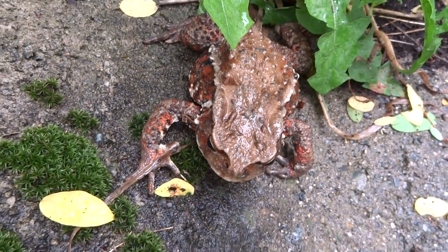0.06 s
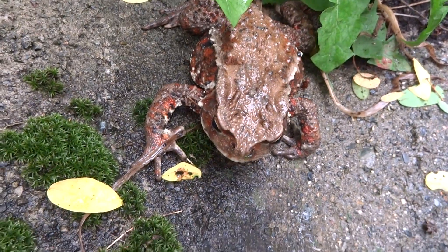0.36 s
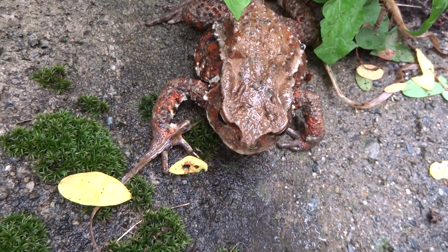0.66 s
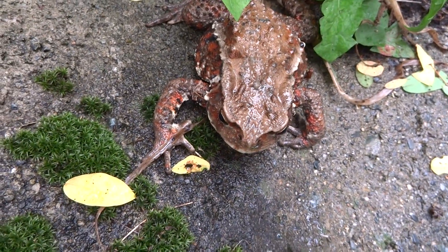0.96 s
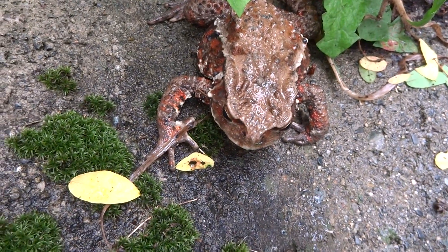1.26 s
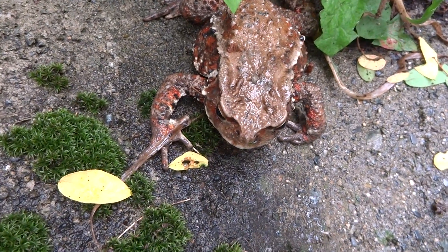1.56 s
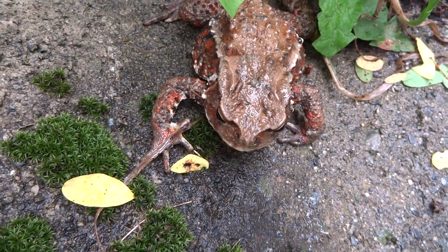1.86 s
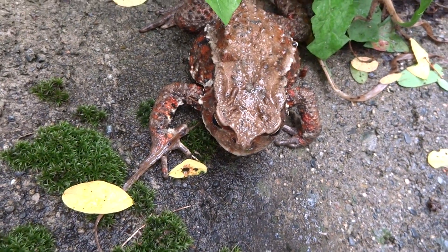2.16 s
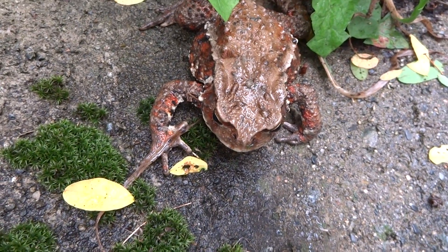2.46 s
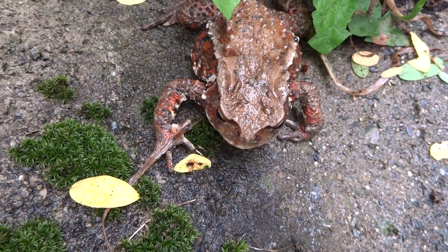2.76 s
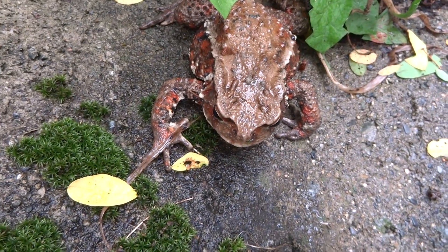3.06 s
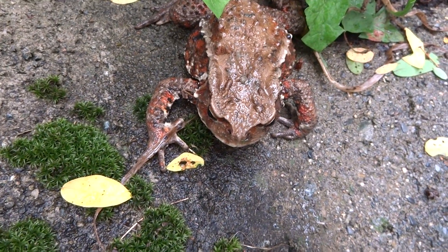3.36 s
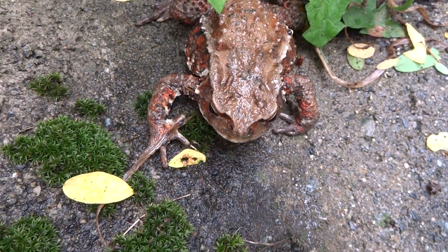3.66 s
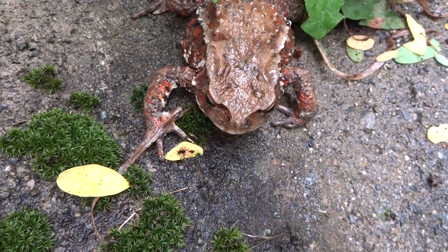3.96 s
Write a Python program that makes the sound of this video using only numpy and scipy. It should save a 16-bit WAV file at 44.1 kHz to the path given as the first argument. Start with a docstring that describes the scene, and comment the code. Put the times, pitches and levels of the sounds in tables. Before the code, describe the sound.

A toad croaks once, close by, from about 1.7 to 2 seconds, in an uneven, creaky run of dry pulses. Fine rain hisses steadily all around for the whole four seconds, with nearer drops ticking here and there. A soft, low plop comes at about 3.1 seconds. At 3.7 seconds there is a sharp, close knock on something small and hard, two contacts almost merged into one.

```python
"""Fine rain hisses all round a stereo pair of microphones, with nearer drops ticking throughout.
From 1.7 s comes a close, croak-like creak: an uneven train of dry pulses. One soft, low plop follows
at 3.1 s. Near the end, close to the microphones, two contacts on a small hard body make a sharp
double knock, ringing nearly the same resonances as the creak."""
import sys
import numpy as np
from scipy import signal
from scipy.fft import rfft, irfft, next_fast_len
from scipy.io import wavfile
from scipy.ndimage import uniform_filter1d

SR = 44100
rng = np.random.default_rng(int(sys.argv[2]) if len(sys.argv) > 2 else 0)


def transcribe(signal):
    """Save signal, clipped to [-1, 1], as a 16-bit WAV file at the path in sys.argv[1]."""
    frames = np.atleast_2d(signal).T
    limited = np.clip(frames, -1, 1)
    pcm = np.round(limited * 32767).astype(np.int16)
    wavfile.write(sys.argv[1], SR, pcm)


N = 176400
HZ = np.fft.rfftfreq(4096, 1 / SR)  # frequency grid of every click
TOP_HZ = 15900

# colour of the rain: f/Hz, relative level/dB
RAIN_COLOUR = [(15, -72), (25, -40), (61, -27), (107, -23.5), (174, -13.5), (235, -16), (284, -12.5),
               (371, -15.5), (513, -9), (572, -7), (691, -9.5), (749, -7), (1090, -5), (1180, -3.5),
               (1780, -4.5), (2460, -3.5), (3780, -3.5), (5670, 0.5), (6490, -1.5), (8050, -23.5),
               (9460, -31.5), (11100, -38), (12400, -33.5), (14200, -17), (15800, -21.5)]
# likeness of the hiss at the two microphones: f/Hz, correlation
RAIN_LIKENESS = [(60, 0.94), (200, 0.92), (450, 0.59), (700, 0.47), (1300, 0.96), (2400, 0.97),
                 (5000, 0.84), (8000, 0.32), (15000, 1)]
# balance of the rain: f/Hz, left over right/dB
RAIN_BALANCE = [(700, 0), (2400, .5), (6000, 1), (8000, 4), (13500, -6), (15500, 3.5)]
# phase of the rain across the pair: f/Hz, left lead/rad
RAIN_PHASE = [(300, 0.13), (1300, 0.53), (3800, 0.011), (7700, 0.13), (14000, 0.99)]
HISS_DB, HISS_PATCHY_DB, HISS_SWELL_DB = -43.5, 1, -0.46
# nearer raindrops: t/s, level/dB, brightness/(dB per octave)
NEAR_DROPS = [(.7030, -7, 0), (.7040, -10, -1.5), (1.0368, -15, -2), (1.1988, -16, -1), (1.4625, -20, 1),
              (1.5246, -14, -.5), (1.6286, -20, 2.5), (1.8483, -5, 0), (2.4866, -14, -3), (2.9465, -16, -1),
              (3.0519, -18, 0), (3.3035, -13, -.5), (3.929, -17, -3)]
FAR_DROP_COUNT, FAR_DROP_DB, FAR_DROP_SPREAD_DB = 210, -26.5, 7
DROP_RIPPLE_DB = 2.2  # colour change from drop to drop
PLOP_S, PLOP_HZ, PLOP_DB, PLOP_RISE_S, PLOP_T60_S, PLOP_LEAD_RAD = 3.1440, 540, -20, .003, .025, 2.07
SCATTER_DB, SCATTER_T60_S = -18, .03

# phase of the close sources across the pair: f/Hz, left lead/rad
CLOSE_PHASE = [(100, 0.91), (700, 2), (1700, 1.28), (2200, 1.4), (3800, 0.93), (8000, 0.25), (14000, 0.35)]
# bands of the close sources that take a cycle or two to swell: f/Hz, width/Hz
SWELL_BANDS = [(2300, 6800), (5200, 3400)]

# contacts: t/s, level/dB, brightness/(dB per octave), crack f/Hz, crack width/Hz, crack boost/dB
KNOCK_CONTACTS = [(3.6786, 2, -3.5, 2300, 700, 3), (3.6865, 0, 0, 4900, 330, 22.5)]
# colour of a contact: f/Hz, level/dB
KNOCK_SPECTRUM = [(100, -42), (450, -22), (900, -8), (1350, -5), (2000, 2), (2650, 8), (3300, -3),
                  (4200, -7), (5700, -10), (7000, -11), (8600, -19), (11000, -40), (15000, -20)]
# resonances of the knocked body: f/Hz, width/Hz, boost/dB
KNOCK_MODES = [(1050, 110, 11), (1755, 115, 12.5), (3960, 110, 5), (6100, 250, 7)]
# balance of the knock: f/Hz, left over right/dB
KNOCK_BALANCE = [(1000, 0.5), (2300, -5), (5000, -0.5)]

# pulses of the creak: t/s, level/dB, brightness/(dB per octave), upper resonance f/Hz
CREAK_PULSES = [(1.6631, -17.5, -2.5, 1650), (1.6937, -14, 4, 2190), (1.7073, -6, 0.5, 2400),
                (1.7182, -4.5, -1.5, 2350), (1.7335, -3, -0.5, 2520), (1.7590, -0.5, -2.5, 2550),
                (1.7921, -1.5, 1, 2510), (1.8256, -0.5, -2, 2700), (1.8815, 1, -1.5, 2550),
                (1.9198, 0.5, 0, 2050), (1.9393, -7, 1.5, 1980), (1.9579, -0.5, -.5, 2020),
                (1.978, -2.5, 2, 2030), (1.9980, -0.5, 0.5, 2220), (2.0241, 0.5, 1, 2960)]
# colour of a pulse: f/Hz, level/dB
CREAK_SPECTRUM = [(100, -52), (450, -25.5), (850, -14.5), (1250, -14.5), (1700, -5), (2200, -9.5),
                  (2750, -6.5), (3450, -5), (3800, -10.5), (4500, -17), (5250, -5.5), (6100, -14),
                  (6800, -27), (8200, -32), (10000, -52), (15000, -55)]
# resonances of the creak: f/Hz, width/Hz, boost/dB
CREAK_MODES = [(1055, 125, 13), (1635, 230, 14.5), (3970, 110, 6)]
# balance of the creak: f/Hz, left over right/dB
CREAK_BALANCE = [(400, -15), (900, 1.5), (1300, -4), (1650, 0), (1950, -11), (2400, -5.5), (3400, -6),
                 (4200, 0), (8000, -1)]
CREAK_DB, UPPER_WIDTH_HZ, UPPER_BOOST_DB = 6.5, 490, 8
PULSE_RIPPLE_DB, MODE_JITTER = 1.04, .01  # colour and relative tuning vary from pulse to pulse
REFLECTION_S, REFLECTION_GAIN = 0.001188, 0.36


def amp(db):
    """Decibels to gain."""
    return 10 ** (np.asarray(db) / 20)


def unit(x):
    """Scale to rms 1."""
    return x / np.sqrt(np.mean(x ** 2) + 1e-20)


def along(points, hz):
    """Read a curve of (f/Hz, value) points on a log frequency axis."""
    f, v = np.transpose(points)
    return np.interp(np.log(hz + 1), np.log(f + 1), v)


def filtered(x, response):
    """Pass x through a complex frequency response."""
    size = next_fast_len(N + SR // 2)
    return irfft(rfft(x, size) * response(np.fft.rfftfreq(size, 1 / SR)), size)[..., :N]


def placed(x, balance, phase):
    """Place a source by its level and phase differences between the two microphones."""
    sides = np.array([[.5], [-.5]])
    return filtered(x, lambda hz: amp(sides * along(balance, hz)) * np.exp(1j * sides * along(phase, hz)))


def rings(modes):
    """Gain in dB of a set of resonances."""
    return sum(10 * np.log10(1 + (amp(db) ** 2 - 1) / (1 + (2 * (HZ - hz) / width) ** 2))
               for hz, width, db in modes)


def tilt(slope):
    """Gain in dB of a brightness slope through the midrange."""
    return slope * np.log2(np.clip(HZ, 400, 8000) / 1700)


def ripple():
    """A random unevenness of colour, rms 1."""
    return unit(uniform_filter1d(uniform_filter1d(rng.standard_normal(len(HZ)), size=30), size=20))


def click(gain_db):
    """The minimum-phase impulse with this spectrum: a sudden start, then its ringing."""
    cepstrum = irfft(np.log(amp(gain_db)))
    half = len(cepstrum) // 2
    causal = np.r_[cepstrum[0], 2 * cepstrum[1:half], np.zeros(half)]
    return irfft(np.exp(rfft(causal)))


def add(track, s, sound):
    """Mix a sound in at time s."""
    part = track[max(round(s * SR), 0):][:len(sound)]
    part += sound[:len(part)]


def rain_hiss():
    """Countless far drops all round merge into a slightly patchy hiss."""
    cells = signal.stft(rng.standard_normal((2, N)), nperseg=512)[2]
    patches = uniform_filter1d(rng.standard_normal(cells.shape[1:]), size=8, axis=0)  # across frequency
    patches = unit(uniform_filter1d(patches, size=12, axis=1))  # across time
    swell = unit(uniform_filter1d(rng.standard_normal(cells.shape[2]), size=30))
    cells = cells * amp(HISS_PATCHY_DB * patches + HISS_SWELL_DB * swell)
    noise = signal.istft(cells, nperseg=512)[1][:, :N]

    def mid_side_gains(hz):
        angle = np.arccos(np.clip(along(RAIN_LIKENESS, hz), -1, 1)) / 2
        return amp(along(RAIN_COLOUR, hz)) * [np.cos(angle), np.sin(angle)]

    mid, side = filtered(noise, mid_side_gains)
    return amp(HISS_DB) * unit(np.array([mid + side, mid - side]))


def raindrops():
    """Single drops, near and far, tick on the ground, each a little to the left or right."""
    out = np.zeros((2, N))
    far_drops = [(rng.uniform(0, N / SR), FAR_DROP_DB + FAR_DROP_SPREAD_DB * rng.normal(), rng.normal())
                 for _ in range(FAR_DROP_COUNT)]
    for s, db, bright in NEAR_DROPS + far_drops:
        tick = click(db + along(RAIN_COLOUR, HZ) + tilt(bright) + DROP_RIPPLE_DB * ripple())
        pan_db = rng.normal()
        add(out[0], s, amp(pan_db) * tick)
        add(out[1], s, amp(-pan_db) * tick)
    return out


def plop():
    """A soft, low, quickly damped ring, its phase leading at the left microphone."""
    t = np.maximum(np.arange(N) / SR - PLOP_S, 0)
    envelope = amp(PLOP_DB - 60 * t / PLOP_T60_S) * (1 - np.exp(-t / PLOP_RISE_S))
    return envelope * np.sin(2 * np.pi * PLOP_HZ * t + np.array([[.5], [-.5]]) * PLOP_LEAD_RAD)


def scatter(x):
    """Stones and leaves nearby answer with a very short diffuse tail."""
    t = np.arange(SR // 10) / SR
    tail = rng.standard_normal((2, len(t))) * amp(-60 * t / SCATTER_T60_S) * (t > .002)
    return signal.fftconvolve(x, tail / np.linalg.norm(tail[0]), axes=1)[:, :N]


def build_up(x):
    """Ringing swells over its first cycles: an all-pass delays it and leaves its colour alone."""
    def lag(f):
        return 2 * sum(np.arctan2(f * width, hz * hz - f * f) for hz, width in SWELL_BANDS)

    return filtered(x, lambda f: np.exp(-1j * lag(f)))


def knock():
    """Close to the microphones, a duller and then a sharper contact ring one small hard body."""
    out = np.zeros(N)
    body_db = along(KNOCK_SPECTRUM, HZ) + rings(KNOCK_MODES)
    for s, db, bright, hz, width, boost_db in KNOCK_CONTACTS:
        crack_db = rings([(hz, width, boost_db)])
        add(out, s, click(db + body_db + tilt(bright) + crack_db))
    return placed(out, KNOCK_BALANCE, CLOSE_PHASE)


def croaking_creak():
    """Close by, each pulse rings nearly the knock's resonances and one of its own, and reflects once."""
    direct = np.zeros(N)
    colour_db = CREAK_DB + along(CREAK_SPECTRUM, HZ)
    for s, db, bright, upper_hz in CREAK_PULSES:
        tuning = 1 + MODE_JITTER * rng.normal()
        modes = [(hz * tuning, width, boost) for hz, width, boost in CREAK_MODES]
        modes.append((upper_hz, UPPER_WIDTH_HZ, UPPER_BOOST_DB))
        add(direct, s, click(db + colour_db + tilt(bright) + rings(modes) + PULSE_RIPPLE_DB * ripple()))
    out = filtered(direct, lambda hz: 1 + REFLECTION_GAIN * np.exp(-2j * np.pi * hz * REFLECTION_S))
    return placed(out, CREAK_BALANCE, CLOSE_PHASE)


def scene():
    """Rain all round, one plop, and the creak and the knock close to the microphones."""
    close = build_up(croaking_creak() + knock())
    rain = placed(rain_hiss() + raindrops(), RAIN_BALANCE, RAIN_PHASE)
    return rain + plop() + amp(SCATTER_DB) * scatter(close) + close


def record(dry):
    """The microphone chain passes nothing above its band limit."""
    return filtered(dry, lambda hz: hz < TOP_HZ)


dry = scene()
out = record(dry)
transcribe(out)
```